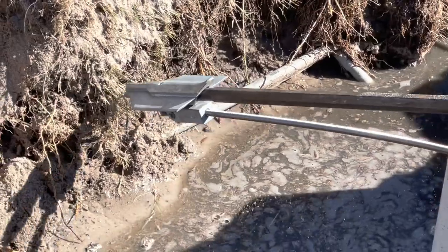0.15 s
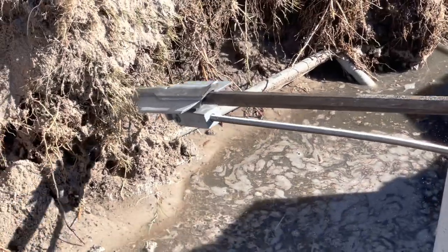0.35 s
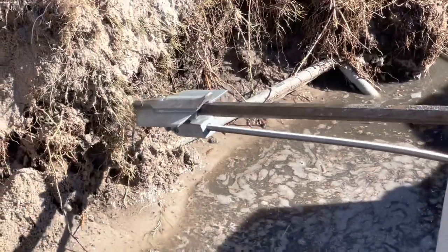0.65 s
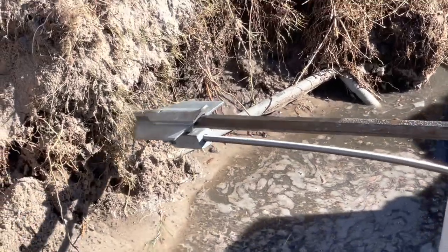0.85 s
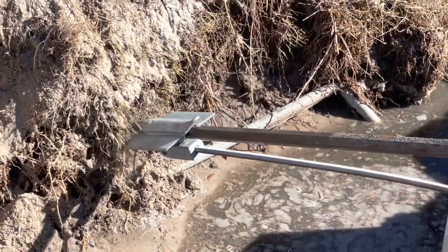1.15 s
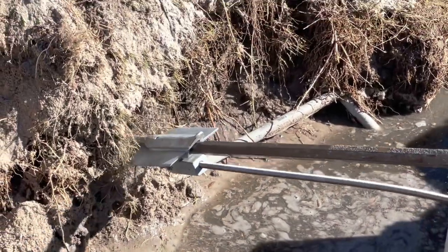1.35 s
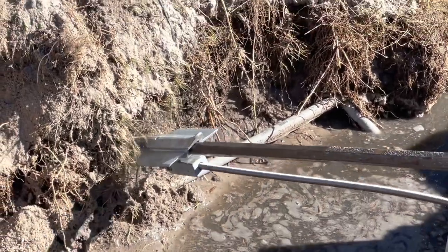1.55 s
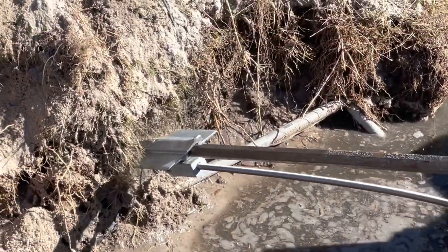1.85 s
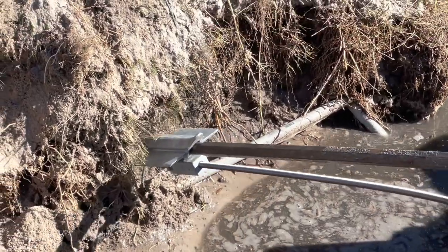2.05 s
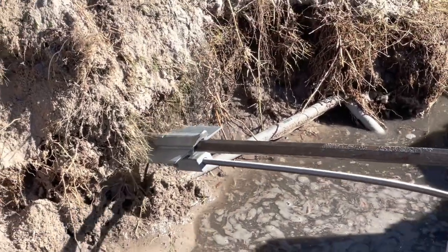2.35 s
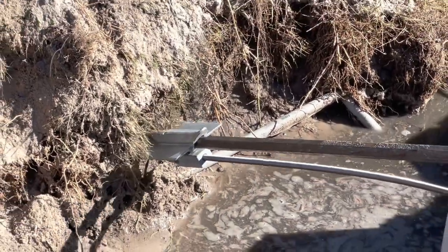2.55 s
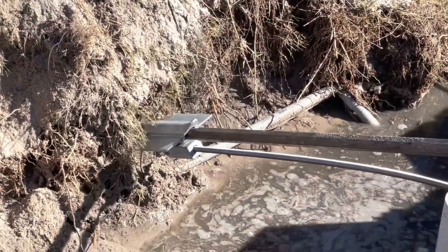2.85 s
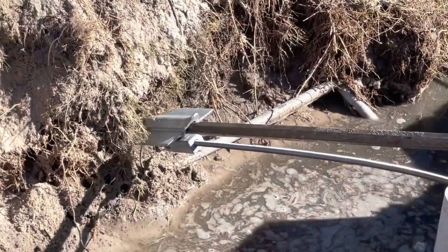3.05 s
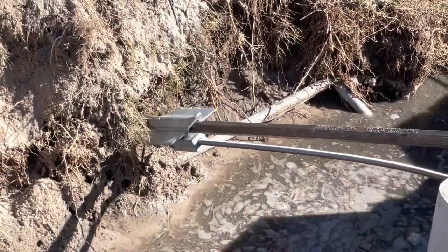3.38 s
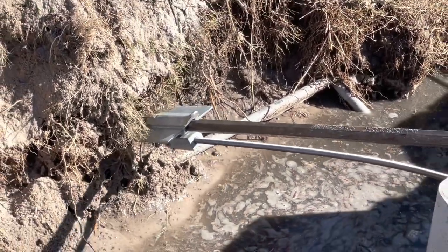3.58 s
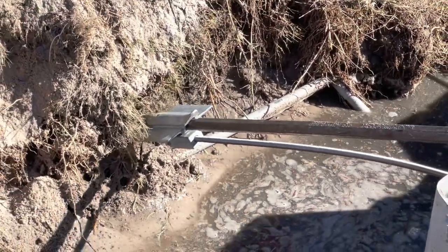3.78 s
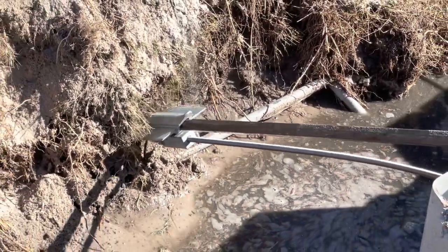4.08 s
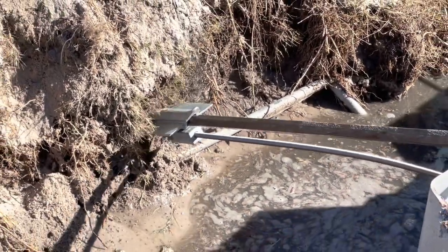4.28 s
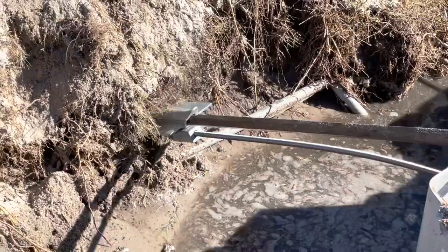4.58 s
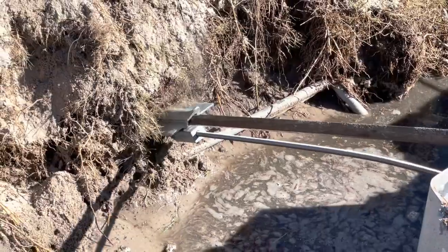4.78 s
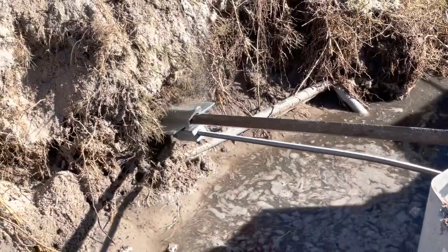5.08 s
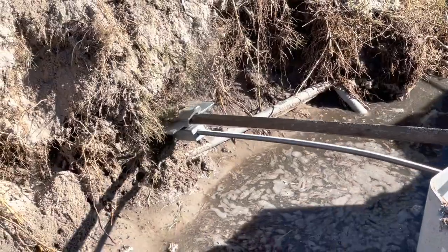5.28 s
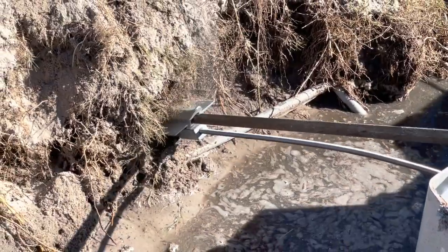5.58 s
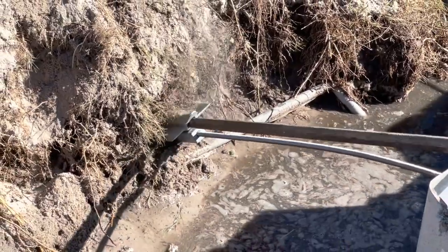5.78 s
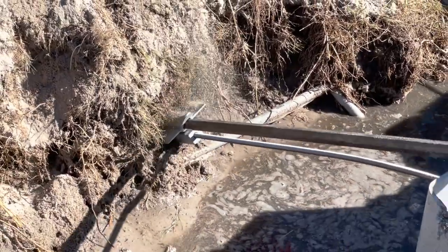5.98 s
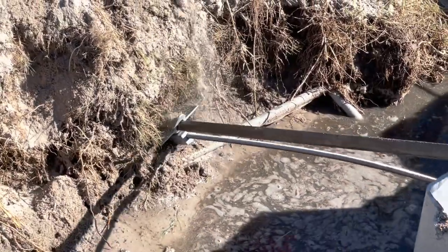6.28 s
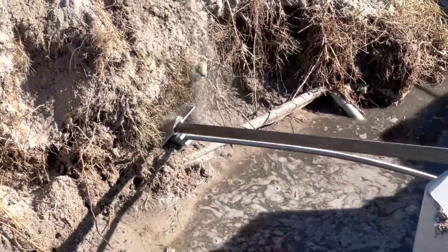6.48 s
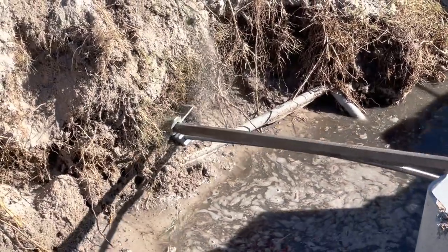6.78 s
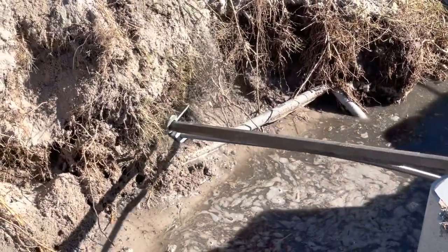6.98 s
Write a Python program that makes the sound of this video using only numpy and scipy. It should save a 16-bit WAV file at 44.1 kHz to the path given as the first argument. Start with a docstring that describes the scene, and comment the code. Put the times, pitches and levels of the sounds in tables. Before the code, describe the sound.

The sound begins mid-action, close to a muddy bank outdoors: a forceful water jet hisses and spatters, bright and ragged, with a thin high nozzle whistle and a ringing steel bar. A big surge swells around 0.3 seconds, with brief spits and metallic squeals. Underneath, mud boils with a low rumble and hollow slosh, while irregular gulps, thuds, pops and wet cracks come several times a second. Smaller surges follow near 1.4, 1.7 and 1.9. From about 2.1 the pressure sags, and at 2.4 the jet collapses with a sputter. In the lull, a few crisp drops tick at 2.7 to 3.55 over a quiet engine and pump drone, the pump easing then loading up again. After a short leak, the jet bursts back at 3.7 with a gurgle, its spray stronger and steel less dominant. Gulping continues, with surges near 5.4 and 6.45 and singing metal snatches from 5.5, until the end around 7.

```python
"""Jetting bar in a muddy bank

At the water's edge, close by: a steel digging bar fed by a pressure hose is worked into the mud.
Jet hiss and ringing steel are noise and grains through spectra and resonances; gulps are bubble tones.
The jet stops for little over a second: drops fall, an engine and pump run on; then it bursts in again."""
import sys
import numpy as np
from scipy import signal
from scipy.fft import rfft, irfft
from scipy.io import wavfile

SR = 44100
rng = np.random.default_rng(int(sys.argv[2]) if len(sys.argv) > 2 else 0)


def to_wav(s):
    """Save 16-bit WAV."""
    ch = np.atleast_2d(s).T  # columns
    pcm = np.round(np.clip(ch, -1, 1) * 32767)  # PCM
    wavfile.write(sys.argv[1], SR, pcm.astype(np.int16))


N = 314874
TIME = np.arange(N) / SR
FREQS = np.maximum(np.fft.rfftfreq(N, 1 / SR), 1)

# A swell's width_s, rise_s or length_s is the standard deviation of its bell shape.

# valve held open: open_s, close_s, spray_db, whistle_db, steel_db (above spray), rumble_db, slosh_db
# (levels before the small trims in jet and churn)
BURSTS = [(-.2, 2.426, -36, -33.5, 4.5, -34.5, -29.5), (3.71, 7.6, -32, -27.5, 0.5, -34, -32.5)]
# before each burst the valve leaks, then is cracked open, then opens fully
LEAK_S, LEAK_DB = 0.12, -21.5
CRACKED_S, CRACKED_DB, ATTACK_S = 0.03, -8, 0.003
# closing: the pressure sags, then the jet collapses
SAG_S, SAG_DB, RELEASE_DB_PER_S = 0.29, -7.5, 115
# the whistle and the steel fade this many times faster (in dB) than the spray
TONES_FADE = 1.2
# the jet breaks free of the mud and surges: peak_s, gain_db, rise_s, fall_s (decay constant)
SURGES = [(.33, 9.5, 0.26, 0.93), (.47, 1.5, 0.049, 0.018), (1.38, 5, 0.011, 0.34), (1.7, 5, 0.0091, 0.056),
          (1.89, 5, 0.0038, 0.36), (3.725, 7.5, 0.011, 0.036), (5.45, 3.5, 0.15, 0.29),
          (6.451, 1.5, 0.29, 0.66)]
# shares of a surge, in dB, that reach the other layers
WHISTLE_FOLLOWS, STEEL_FOLLOWS, RUMBLE_FOLLOWS, SLOSH_FOLLOWS = 0.43, 0.75, 1, 0.62
# the whistle comes and goes as mud covers the nozzle
WHISTLE_WAVER_DB, WHISTLE_WAVER_HZ = 1.3, 7
# the nozzle spits, longest as the pressure fails: centre_s, level_db (before trim in hiss), length_s
SPITS = [(0.291, -17.5, .0018), (0.318, -23, 0.0018), (.367, -21, 0.0025), (0.655, -18.5, 0.0024),
         (2.286, -26.5, 0.0056), (2.359, -23.5, 0.0083), (2.446, -26.5, 0.0037), (2.456, -33, 0.0052),
         (3.69, -27, 0.0027), (3.703, -33, 0.0035), (3.8, -21.5, 0.0044), (3.88, -25, .003),
         (5.435, -23, 0.00067), (5.855, -27, 0.0026), (7, -19.5, 0.0014)]
# spectrum of the spray: pitch_hz, level_db (relative, per Hz)
SPRAY_SPECTRUM = [(900, -2.5), (1800, 2), (2800, 0), (3600, 2), (4600, -2.5), (5600, 4.5), (7500, 3.5),
                  (8500, 4.5), (9600, 0.5), (10800, 2.5), (12300, -17), (13300, -3.5), (14200, -1),
                  (15000, -10), (15500, -22.5)]
# resonances of the nozzle: pitch_hz, width_hz, level_db (relative)
NOZZLE_MODES = [(11130, 115, 11), (11690, 130, 9), (12290, 260, 2), (13100, 500, 0)]
# resonances of the steel bar: pitch_hz, width_hz, level_db (relative)
STEEL_MODES = [(1355, 12, -11), (1478, 50, -6.5), (1575, 30, -10), (1870, 11, -12), (1972, 20, -7),
               (2195, 36, -10), (2640, 90, -9), (2760, 50, -8), (2792, 28, -3.5), (2860, 90, -9),
               (2935, 28, -11), (3095, 30, -16), (3868, 50, -17), (6228, 16, -17)]
# the blade sings in snatches near 6.5 kHz, and the steel bar's ring swells briefly near 2 kHz: centre_s,
# length_s, level_db (above spray), pitch_hz, width_hz
SNATCHES = [(0.323, 0.0045, 8, 6600, 110), (0.375, 0.045, -6, 6800, 110), (0.464, 0.012, 5, 6550, 81),
            (0.982, 0.062, 0, 6700, 63), (1.375, 0.054, -3, 6730, 130), (1.931, 0.061, -2, 6750, 110),
            (5.552, 0.14, -1.5, 1972, 27), (5.86, 0.034, -3, 1844, 7.1), (6.425, 0.029, -4, 6830, 98),
            (6.493, 0.062, -1.5, 6310, 33), (6.6, 0.019, -9, 6540, 110), (6.714, 0.092, -0.5, 2003, 25),
            (6.784, .04, -2.5, 6350, 160), (7.05, 0.038, -3, 1884, 9.1)]

# air pockets bursting out of the mud:
# moment_s (near the loudest point), thud_db, pop_db, crack_db, after_ring_db
GULPS = [(0.059, -14.5, -23.5, -27, -26), (0.098, -18.5, -33, -24.5, -21), (0.202, -25, -27, -29, -25),
         (0.27, -24.0, -26, -22, -35), (0.352, -23.0, -26, -18.5, -25), (0.37, -15.5, -33, -19, -30),
         (0.402, -16, -35, -27, -36), (0.487, -16.5, -26, -19, -23), (0.581, -33, -19, -25, -38),
         (0.695, -20, -25, -23.5, -25), (0.706, -18, -16, -27, -19), (0.913, -22, -38, -18.5, -29.5),
         (0.997, -20.5, -40, -23, -29), (1.076, -25.5, -24.5, -34.0, -35), (1.17, -24, -27.5, -32.5, -40),
         (1.24, -24.5, -30, -32, -25), (1.329, -24, -19.5, -25, -28), (1.366, -20.5, -27.5, -35, -35),
         (1.479, -18.5, -29, -26, -26), (1.637, -18, -22.5, -26, -27), (1.728, -25, -31.0, -25, -29),
         (1.801, -22, -31.0, -34.5, -23), (1.895, -21, -22, -26.0, -38), (1.978, -29, -31, -30.0, -42),
         (2.112, -17, -27.5, -20.5, -20.5), (3.751, -25.5, -35, -29.5, -39.0), (3.788, -30, -29, -24, -43),
         (3.833, -19, -20, -14.5, -36), (3.859, -27.0, -24, -30, -22), (3.943, -23, -25, -20.5, -33),
         (3.984, -29, -23, -34, -28), (4.051, -20.0, -33, -26, -26), (4.325, -16.5, -25, -25, -24),
         (4.43, -19.5, -21, -24.5, -29), (4.548, -18.5, -34, -22, -25), (4.618, -23, -30, -35, -36),
         (4.917, -26.5, -32, -28, -31), (5.029, -22, -26, -35.0, -33), (5.038, -20.5, -32, -28, -25),
         (5.11, -20.5, -33, -28, -29), (5.171, -23, -28, -35, -32), (5.291, -24, -24.5, -25, -44),
         (5.528, -13.5, -19, -23.0, -29), (5.65, -21, -30, -20.5, -23), (5.765, -19.5, -22.5, -28.5, -39),
         (5.832, -26, -36.5, -33, -46), (5.948, -16.5, -26, -34, -36), (6.007, -21.5, -26, -35.5, -37),
         (6.103, -23, -25, -31, -32), (6.158, -22, -36, -24, -38), (6.249, -22, -26, -36, -44),
         (6.484, -22, -16.5, -25.5, -24.5), (6.819, -28, -21, -30, -23.5)]
# pitches at which the thud, pop and crack levels apply
THUD_HZ, POP_HZ, CRACK_HZ = 420, 750, 1400
# the hole radiates little below this
GULP_LOW_HZ = 200
# bubbles a pocket sheds, small first: pitch_hz, level_db (relative), born_after_s, born_within_s (+-)
BUBBLES = [(1600, -5, -.0055, .003), (1200, -4.5, -.0045, .003), (860, -3.5, -.0035, .0035),
           (620, -2.5, -.003, .0035), (440, -1.5, .0005, .005), (320, -3, .003, .006),
           (215, -14, .003, .008)]
# what the hole rings on with: pitch_hz, level_db (relative to after_ring_db)
AFTER_RING = [(328, -5.5), (440, -1.5)]
# spectrum of the torn surface: pitch_hz, level_db (relative, per Hz)
SPLASH_SPECTRUM = [(200, -22.5), (400, -7.5), (800, 1.5), (1100, -2.5), (1500, 11), (2300, -7),
                   (3500, -3.5), (6000, -9), (10000, -28)]

# spectra of the boiling water, deep and hollow: pitch_hz, level_db (relative, per Hz)
RUMBLE_SPECTRUM = [(20, -36.5), (38, -23), (52, -6.5), (67, 8), (90, -5), (140, -0.5), (200, -2.5),
                   (300, -44.5), (600, -32.5), (2000, -54)]
SLOSH_SPECTRUM = [(25, -43.5), (80, -26), (200, -9), (330, -3), (450, -8), (650, 6), (1100, 0),
                  (1450, -7.5), (1750, -6), (2400, 1), (3500, -18), (8000, -36)]
# resonances of the flooded hole: pitch_hz, width_hz, level_db (relative)
HOLE_MODES = [(206.3, 10, 1.5), (324, 25.5, 5), (443.5, 30, 3), (623.6, 19, -1.5)]
# the water answers late, comes to rest slowly and churns less as the hole deepens
WATER_LAG_S, CALM_DB_PER_S, DEEPEN_DB_PER_S = 0.16, 46.5, 1.4
# each gulp stirs the hole; levels are relative to its thud
STIR_AFTER_S, STIR_S, STIR_RUMBLE_DB, STIR_SLOSH_DB = 0.003, 0.0097, -16, -11
# hollow notes as the pressure changes: centre_s, length_s, level_db, pitch_hz, width_hz
GURGLES = [(0.1, 0.14, -32, 205, 28.5), (2.387, 0.083, -42, 650, 71.4), (3.71, 0.016, -34, 550, 700),
           (3.819, 0.084, -23.5, 225, 91.7)]

# drops and grit land: start_s, level_db (nominal), t60_s, low_edge_hz
DROPS = [(2.6787, -37.5, 0.013, 5530), (2.925, -31, 0.088, 2800), (2.981, -31, 0.012, 5500),
         (2.994, -42, .01, 5500), (3.069, -28.5, 0.011, 5500), (3.417, -45, 0.13, 3500),
         (3.468, -35, 0.12, 2814), (3.5506, -44, 0.0094, 5000)]
# the blade, tapped by grit: pitch_hz, level_db (relative), t60_s
BLADE_MODES = [(4300, -27.5, .075), (8250, -11, 0.058), (9200, -12.5, 0.21), (9200, -25, 0.26),
               (11300, -6.5, 0.19), (13200, -9, .15)]

# load on the machines: time_s, load (share of normal)
LOAD = [(2.35, 0.99), (2.6, 0.52), (2.85, 0.04), (3.25, 0.038), (3.5, 0.82), (3.7, 1), (4.1, .8)]
# unloaded fundamentals, and the share of its pitch that the pump loses under normal load
ENGINE_HZ, PUMP_HZ, DROOP = 53.8, 176.8, 0.03
# partials of each machine: multiple, idle_db, load_gain_db
ENGINE_ORDERS = [(1, -48, -.5), (1.999, -54.5, 5.5), (3.001, -63.5, -4.5), (6.082, -72, -0.5)]
PUMP_ORDERS = [(1, -57.5, 11.5), (1.39, -72.5, 24.5), (2.001, -67.5, 5.5), (2.77, -65, 0.5), (3, -79, 0.5),
               (4, -80, 1.5), (5, -74, 4.5), (5.52, -79, 5)]
# spectrum of the outdoor air: pitch_hz, level_db (relative, per Hz)
AIR_SPECTRUM = [(20, -30), (40, -17), (70, -6), (130, -0.5), (190, -8.5), (260, -22.5), (450, -19.5),
                (750, -22.5), (1500, -27.5), (3000, -37), (6000, -43.5), (9000, -47), (15000, -55)]

# left-right likeness at the microphone: pitch_hz, likeness (1 is identical)
LIKENESS = [(60, .999), (130, .985), (290, .94), (600, .76), (1300, .52), (1700, .72), (2200, .97),
            (3600, .92), (6000, .99), (9500, .94), (12000, .97), (15000, .8)]
# balance at the microphone: pitch_hz, left_minus_right_db
BALANCE = [(100, 0), (200, 1), (400, 1), (700, -.5), (1300, 2.5), (2200, 0)]
# the two microphone ports: pitch_hz, left_lead_rad
PORT_PHASE = [(100, 0), (1400, -.8), (2200, 0), (3100, .6), (5500, .05), (8850, 0), (9200, -1.5),
              (10250, -3.14), (11900, -6.2), (12300, -6.4), (13500, -9.3), (14400, -9.5), (15000, -12.5)]
CUTOFF_HZ = 15250
CEILING = 0.92   # full scale is 1


def jet(flutter_db=0.2, flutter_hz=55, surge_db=2.17, surge_hz=54):
    """The ragged jet throws grit and spray; the same flutter drives the nozzle and the steel."""
    spray, whistle, bar = 0, 0, 0
    for gate, (_, _, spray_db, whistle_db, steel_db, _, _) in zip(valve(), BURSTS):
        tone_gate = gate ** TONES_FADE
        spray = spray + gate * from_db(spray_db)
        whistle = whistle + tone_gate * from_db(whistle_db)
        bar = bar + tone_gate * from_db(spray_db + steel_db)
    push_db = surges(TIME)
    spray = spray * from_db(push_db)
    waver_db = WHISTLE_WAVER_DB * drift(WHISTLE_WAVER_HZ)
    whistle = whistle * from_db(WHISTLE_FOLLOWS * push_db + waver_db)
    bar = bar * from_db(STEEL_FOLLOWS * push_db)

    flutter = spatter() * from_db(flutter_db * drift(flutter_hz) + surge_db * drift(surge_hz))
    spits = sum(from_db(db) * swell(s, length) for s, db, length in SPITS)
    hiss_gain = from_db(2.5) * spray + from_db(-3.5) * spits
    hiss = hiss_gain * coloured(flutter * grains(18000, 1.1), SPRAY_SPECTRUM)
    # the flow inside the nozzle is steadier than the spray outside
    steadier = np.sqrt(flutter)
    flow = steadier * rng.standard_normal((2, N))
    nozzle = (from_db(3.0) * whistle + spits) * resonate(flow, NOZZLE_MODES)
    ring = bar * steel(steadier * grains(4000, 1.2))
    return hiss + nozzle + ring + spray * tip()


def valve():
    """Gain of the jet in each burst: leak, two opening steps, hold, sag and release."""
    steps_s = [-CRACKED_S - LEAK_S, -CRACKED_S - ATTACK_S, -CRACKED_S, -ATTACK_S, 0]
    steps_db = [2 * LEAK_DB, LEAK_DB, CRACKED_DB, CRACKED_DB, 0]
    for opens, closes, *_ in BURSTS:
        start_db = np.interp(TIME - opens, steps_s, steps_db, left=-np.inf)
        sag_db = SAG_DB * np.clip((TIME - closes) / SAG_S + 1, 0, 1)
        release_db = RELEASE_DB_PER_S * np.maximum(TIME - closes, 0)
        yield from_db(start_db + sag_db - release_db)


def surges(at):
    """Decibels by which the jet swells as it breaks free and relaxes again."""
    push_db = 0
    for s, db, rise, fall in SURGES:
        relaxing = np.exp(-np.abs(at - s) / fall)
        push_db = push_db + db * np.where(at < s, swell(s, rise, at), relaxing)
    return push_db


def spatter(per_s=140, decay_s=0.0027, size=0.42):
    """Slugs of water land at random: each lifts the hiss at once and dies away."""
    slugs = (rng.random(N) < per_s / SR) * np.minimum(rng.exponential(1, N), 2)
    lift = signal.lfilter([1], [1, -np.exp(-1 / (decay_s * SR))], slugs)
    return rms_one(1 + size * lift)


def steel(strikes, waver_db=1.4, waver_hz=9, bend=0.002, bend_hz=9):
    """Grit strikes the bar; each mode wavers on its own, and all bend together as the mud grips and frees the
    steel."""
    out = 0
    for hz, width, db in STEEL_MODES:
        r = np.exp(-np.pi * width / SR)
        poles = [1, -2 * r * np.cos(2 * np.pi * hz / SR), r * r]
        ring = signal.lfilter([1, 0, -1], poles, strikes)
        # the level of each mode wavers on its own
        out = out + from_db(db + waver_db * drift(waver_hz)) * rms_one(ring)
    # reading the sound at uneven times bends its pitch
    bent = TIME + bend / (2 * np.pi * bend_hz) * drift(bend_hz)
    return rms_one(spread(np.array([np.interp(bent, TIME, side) for side in out])))


def tip():
    """Unsteady tones where the jet grazes the blade, and brief swells of the bar's ring near 2 kHz: narrow
    random bands round each pitch."""
    out = np.zeros(N)
    for s, length, db, hz, width in SNATCHES:
        near = np.abs(TIME - s) < 4 * length
        t = TIME[near]
        wander = drift(width)[near] + 1j * drift(width)[near]
        tone = np.real(wander * np.exp(2j * np.pi * hz * t))
        out[near] += from_db(db) * swell(s, length, t) * tone
    return out


def gulps(count=3, scatter=0.13, cycles=7.5, uneven_db=3.0, jitter=0.35):
    """Each pocket breaks into a quick rattle of bubbles, each with a hard start and a few cycles of ring."""
    out = np.zeros((2, N + SR))
    t = np.arange(SR // 10) / SR - 0.035   # seconds from the gulp's moment
    for s, thud_db, pop_db, crack_db, _ in GULPS:
        start = max(round((s + t[0]) * SR), 0)
        levels = [(THUD_HZ, thud_db), (POP_HZ, pop_db), (CRACK_HZ, crack_db)]
        for hz, db, after, within in BUBBLES:
            chance = rng.standard_normal((4, 2, count, 1))
            order = np.linspace(-1, 1, count)[:, None]
            born = after + within * (order + jitter * chance[0])
            turns = np.maximum(t - born, 0) * hz * np.exp(scatter * chance[1])
            size = np.sign(chance[2]) * from_db(uneven_db * chance[3])
            # each bubble falls 60 dB in the given number of cycles
            decay = np.exp(-turns * np.log(1000) / cycles)
            cloud = np.sum(size * np.sin(2 * np.pi * turns) * decay, axis=1)
            # equal energy: that of 11 ms at unit power
            cloud /= np.sqrt(np.sum(cloud ** 2, axis=1, keepdims=True) / (0.011 * SR))
            out[:, start:start + len(t)] += from_db(db + at_hz(levels, hz)) * cloud
    high_pass = signal.butter(2, GULP_LOW_HZ, "high", fs=SR, output="sos")
    return spread(signal.sosfilt(high_pass, out[:, :N]))


def after_rings(peak_s=0.02, scatter=0.035, rough=0.54, rough_hz=70):
    """After a gulp the hole rings on briefly, raggedly and at its own pitch."""
    out = np.zeros((2, N + SR))
    age = np.arange(SR // 8) / SR
    shape = (age / peak_s * np.exp(1 - age / peak_s)) ** 2
    ragged = np.pad(1 + rough * drift(rough_hz), (0, SR))
    for s, *_, ring_db in GULPS:
        start = round(s * SR)
        span = slice(start, start + len(age))
        for hz, db in AFTER_RING:
            turns = hz * np.exp(scatter * rng.standard_normal()) * age + rng.random((2, 1))
            out[:, span] += from_db(ring_db + db) * shape * ragged[span] * np.sin(2 * np.pi * turns)
    return spread(out[:, :N])


def splashes(lead_s=0.003, width_s=0.004, splash_db=-2, spatter_s=0.02, spatter_db=-7):
    """Each pocket tears the surface open with a crack of grainy noise; mud patters back."""
    coarse = TIME[::20]
    gain = 0
    for s, _, _, crack_db, _ in GULPS:
        tear = swell(s - lead_s, width_s, coarse)
        patter = from_db(spatter_db) * swell(s + spatter_s / 2, spatter_s / 2, coarse)
        gain = gain + from_db(crack_db + splash_db) * np.maximum(tear, patter)
    return np.interp(TIME, coarse, gain) * coloured(grains(2500, 3.0), SPLASH_SPECTRUM)


def churn(lump_db=3.0, lump_hz=22):
    """Muddy water boils: a deep rumble, a wash of many small collapses, and the flooded hole ringing."""
    rumble, slosh = agitation()
    collapses = grains(2500, 0.5) * from_db(lump_db * drift(lump_hz))
    deep = from_db(-0.5) * rumble * coloured(grains(5000, 1.0), RUMBLE_SPECTRUM)
    wash = from_db(-1.0) * coloured(collapses, SLOSH_SPECTRUM)
    hollow = resonate(grains(2500, 3.74), HOLE_MODES)
    return deep + slosh * (wash + hollow)


def agitation():
    """Gains of rumble and slosh: the jet sets the water going, surges and gulps stir it further."""
    levels = 0
    for opens, closes, *_, rumble_db, slosh_db in BURSTS:
        age = TIME - opens
        deepening_db = DEEPEN_DB_PER_S * np.maximum(age, 0)
        calming_db = CALM_DB_PER_S * np.maximum(TIME - closes + SAG_S, 0)
        onset = np.clip((age + CRACKED_S) / WATER_LAG_S, 0, 1)
        levels = levels + onset * from_db([[rumble_db], [slosh_db]] - deepening_db - calming_db)
    push_db = surges(TIME - WATER_LAG_S) * [[RUMBLE_FOLLOWS], [SLOSH_FOLLOWS]]
    coarse = TIME[::20]
    stir = 0
    for s, thud_db, *_ in GULPS:
        stir = stir + from_db(thud_db) * swell(s + STIR_AFTER_S, STIR_S, coarse)
    stir = np.interp(TIME, coarse, stir)
    return levels * from_db(push_db) + stir * from_db([[STIR_RUMBLE_DB], [STIR_SLOSH_DB]])


def gurgles():
    """Air and water churn in the hose and the draining hole: brief resonances fed by grains."""
    out = 0
    for s, length, db, hz, width in GURGLES:
        out = out + from_db(db) * swell(s, length) * resonate(grains(1500, 0.73), [(hz, width, 0)])
    return out


def drops(high_hz=9500, ring_db=-21, body_db=-20, body_low_hz=700):
    """Short bright splats, each a tick with a little body, a fizzing tail and a faint ring of the blade."""
    out = np.zeros((2, N))
    age = np.arange(SR // 2) / SR
    for s, db, t60, low_hz in DROPS:
        tail = 0.35 * from_db(-60 * age / t60)
        tick = 0.42 * np.exp(-age / 0.00056)
        noise = (tail + tick) * rng.standard_normal(len(age))
        splat = band(noise, low_hz, high_hz) + from_db(body_db) * band(noise, body_low_hz, low_hz)
        ring = 0
        for hz, mode_db, life in BLADE_MODES:
            ring = ring + from_db(ring_db + mode_db - 60 * age / life) * np.sin(2 * np.pi * hz * age)
        start = round(s * SR)
        out[:, start:start + len(age)] += from_db(db) * (splat + ring)
    return out


def machines(wobble=0.0015, wobble_hz=3.0, uneven_db=1.5, uneven_hz=3.9):
    """A distant engine and pump drone over the outdoor air; load slows the pump and makes it louder."""
    load = np.interp(TIME, *np.transpose(LOAD))
    out = from_db(-49.0) * coloured(rng.standard_normal((2, N)), AIR_SPECTRUM)
    for hz, droop, orders in ((ENGINE_HZ, 0, ENGINE_ORDERS), (PUMP_HZ, DROOP, PUMP_ORDERS)):
        speed_hz = hz * (1 - droop * load ** 2 + wobble * drift(wobble_hz))
        phase = 2 * np.pi * np.cumsum(speed_hz) / SR
        for k, idle_db, load_db in orders:
            # partials below the third waver less
            waver_db = uneven_db * min(k / 3, 1) * drift(uneven_hz)
            tone = np.sqrt(2) * np.sin(k * phase + rng.uniform(0, 2 * np.pi))
            out = out + from_db(idle_db + load_db * load + waver_db) * tone
    return out


def from_db(db):
    """Decibels to gain."""
    return 10 ** (np.asarray(db) / 20)


def rms_one(x):
    """Scale to unit power."""
    return x / np.sqrt(np.mean(x ** 2) + 1e-20)


def at_hz(points, hz):
    """Read a spectrum on a log-frequency axis."""
    f, value = np.transpose(points)
    return np.interp(np.log(hz), np.log(f), value)


def swell(s, width_s, at=TIME):
    """A smooth bump round one moment."""
    return np.exp(-0.5 * np.minimum(((at - s) / width_s) ** 2, 60))


def drift(rate_hz):
    """Smooth chance of spread 1: low-passed noise, made at a twentieth of the sample rate."""
    r = np.exp(-40 * np.pi * rate_hz / SR)
    noise = rng.standard_normal(N // 20 + 4002)
    slow = signal.lfilter([1], [1, -2 * r, r * r], noise)[4000:]   # drop the run-in
    return np.interp(np.arange(N) / 20, np.arange(len(slow)), rms_one(slow))


def grains(per_s, spread_db):
    """Two unrelated streams of tiny impacts of uneven size."""
    born = rng.random((2, N)) < per_s / SR
    size = rng.standard_normal((2, N))
    boost_db = spread_db * np.minimum(rng.exponential(1, (2, N)), 4)
    return rms_one(born * size * from_db(boost_db))


def band(x, low_hz, high_hz):
    """Keep what lies between two edges."""
    return signal.sosfilt(signal.butter(2, [low_hz, high_hz], "band", fs=SR, output="sos"), x)


def spread(pair, gain=1):
    """Colour two unrelated signals and mix them into left and right with the given likeness."""
    alike = np.clip(at_hz(LIKENESS, FREQS), 0, 1)
    mid, side = rfft(pair) * gain
    mid = np.sqrt((1 + alike) / 2) * mid
    side = np.sqrt((1 - alike) / 2) * side
    return irfft(mid + side * [[1], [-1]], N)


def coloured(pair, spectrum):
    """Stereo sound of unit power with a given spectrum."""
    return rms_one(spread(pair, from_db(at_hz(spectrum, FREQS))))


def resonate(pair, modes):
    """Parallel resonances of alternating sign, each with its share of power, scaled to unit power."""
    gain = 0
    for k, (hz, width, db) in enumerate(modes):
        peak = (-1) ** k * from_db(db) / np.sqrt(width)
        gain = gain + peak / (1 + 1j * (FREQS ** 2 - hz ** 2) / (FREQS * width))
    return rms_one(spread(pair, gain))


def scene():
    """Jet and hole close to the microphone, slightly off centre; machines behind."""
    near = jet() + churn() + gulps() + after_rings() + splashes() + gurgles() + drops()
    work = rfft(near)
    lead = np.interp(FREQS, *np.transpose(PORT_PHASE))
    work[1] *= np.exp(-1j * lead)   # the right port hears later where left leads
    balance = from_db(at_hz(BALANCE, FREQS) * [[0.5], [-0.5]])
    return irfft(work * balance, N) + machines()


def record(dry):
    """The highest peaks are rounded and the top is cut steeply."""
    rounded = dry / (1 + (dry / CEILING) ** 6) ** (1 / 6)
    low_pass = signal.ellip(10, 0.1, 80, CUTOFF_HZ, fs=SR, output="sos")
    return signal.sosfilt(low_pass, rounded)


dry = scene()
out = record(dry)
to_wav(out)
```